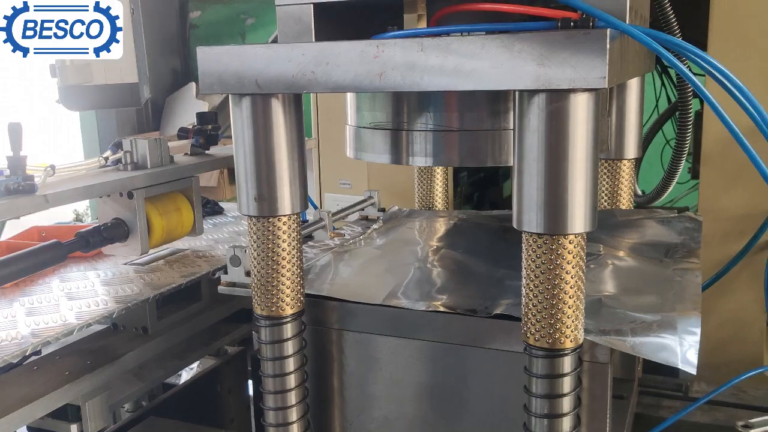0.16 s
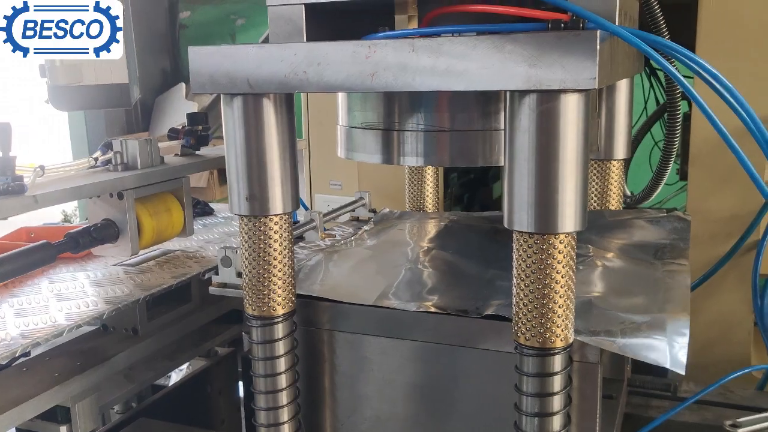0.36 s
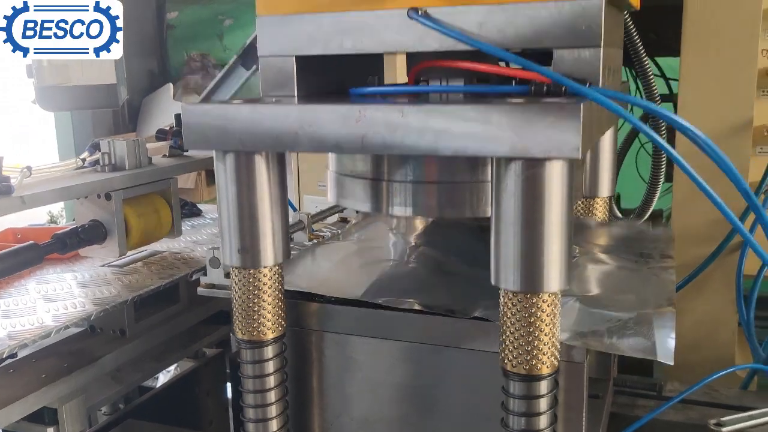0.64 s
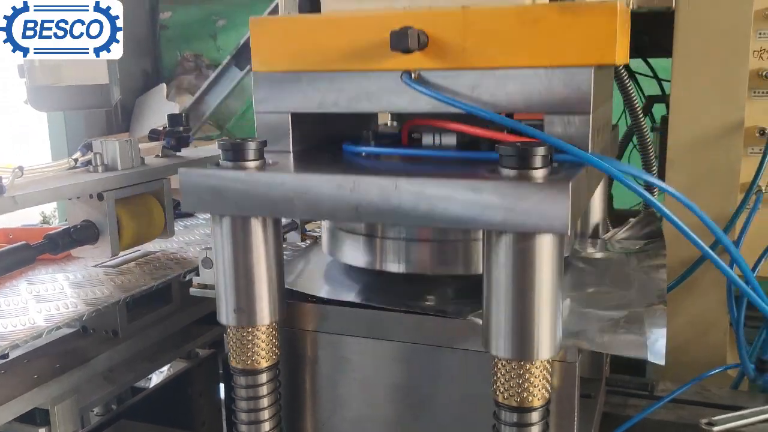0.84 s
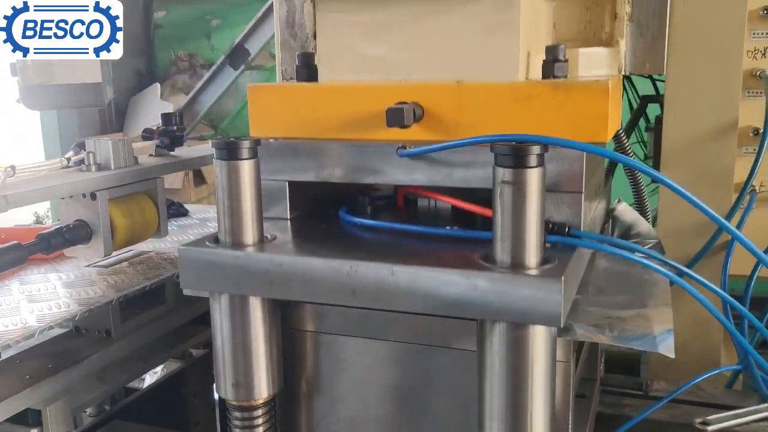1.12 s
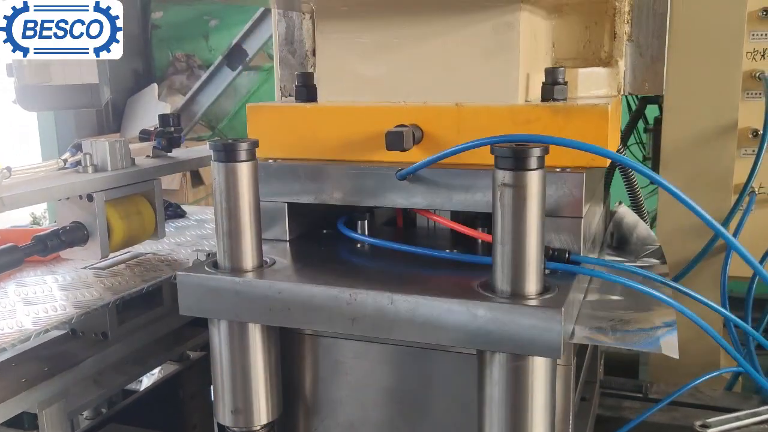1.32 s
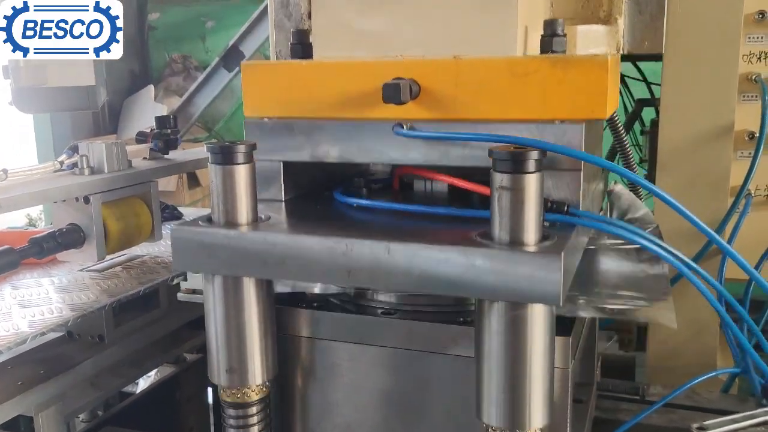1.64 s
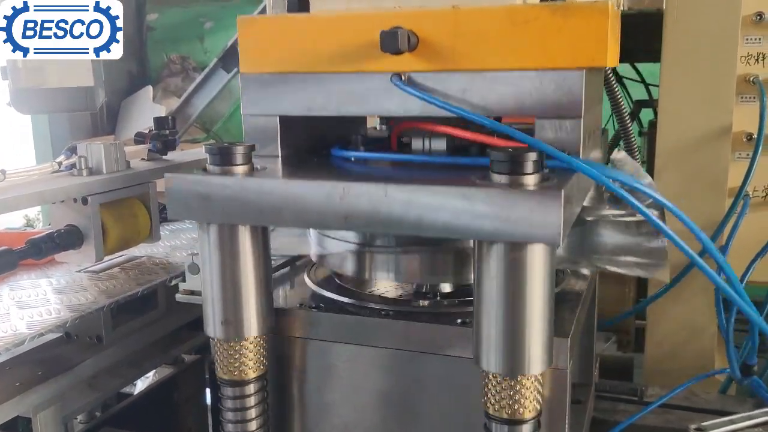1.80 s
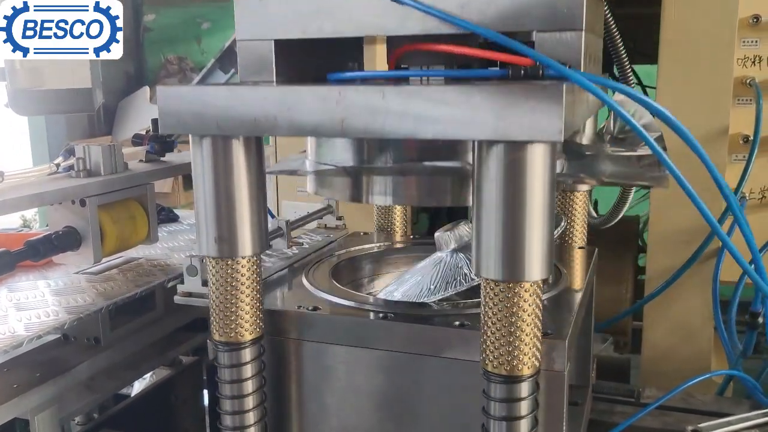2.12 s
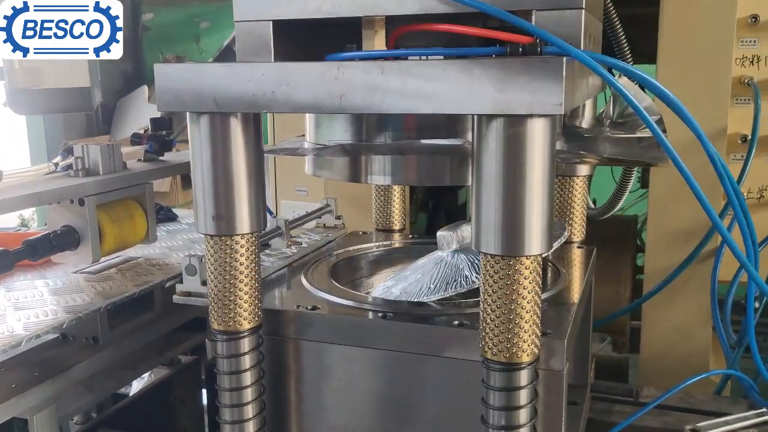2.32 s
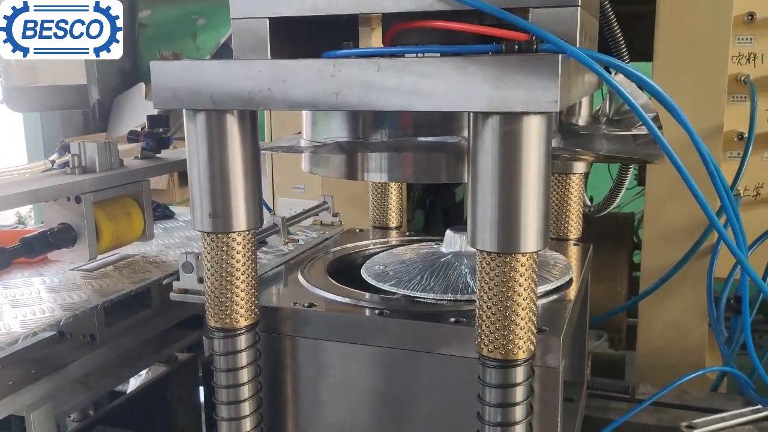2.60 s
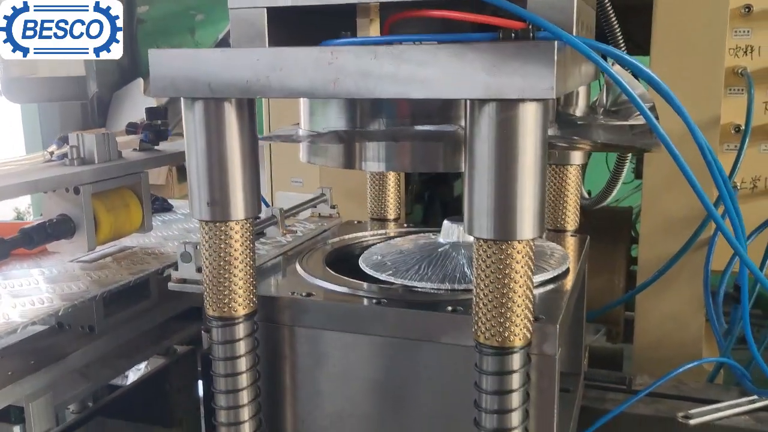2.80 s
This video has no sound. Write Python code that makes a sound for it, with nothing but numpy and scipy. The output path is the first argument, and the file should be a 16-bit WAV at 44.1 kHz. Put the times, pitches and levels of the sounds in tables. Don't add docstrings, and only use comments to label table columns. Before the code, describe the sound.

Close phone pickup of a metal press cycling in a noisy hall: clunk, pause, clattering die blows and foil crinkle, heavy bang with low throb, strong half-second air blast, then small knocks and rattling.

```python
import sys
import numpy as np
from scipy import signal
from scipy.fft import rfft, irfft, next_fast_len
from scipy.io import wavfile
from scipy.ndimage import uniform_filter1d

SR = 44100
rng = np.random.default_rng(int(sys.argv[2]) if len(sys.argv) > 2 else 0)


def nominal_scale(level):
    x = np.asarray(level, float) / 20
    return 10 ** x


def output_pcm(signal):
    pcm = np.clip(np.atleast_2d(signal).T, -1, 1) * 32767
    wavfile.write(sys.argv[1], SR, np.round(pcm).astype(np.int16))


N = 130095

# f/Hz, level/dB, t60/s
FRAME_MODES = [(198.5, -36, 0.083), (272, -24, 0.076), (295.2, -1, 0.4), (381, -3.5, 0.59), (558, -2, 0.47),
               (679, -10.5, 0.33), (724, 2.5, 0.21), (981, 0, 0.19), (1070, -25, 0.1), (1216, -19, 0.89),
               (1461, -0.5, 0.15), (1767, 11.5, 0.041), (2084, 1, 0.17), (2507, -37, 0.096)]


def level(x, db):
    return x * nominal_scale(db) / np.sqrt(np.mean(x ** 2))


def curve(table, axis=1):
    rows = np.array(table)
    return np.interp(np.arange(N) / SR, rows[:, 0], rows[:, axis])


def colour(x, tone):
    rows = np.array(tone, float)
    hz = np.arange(N // 2 + 1) * SR / N + 1
    gain_db = np.interp(np.log(hz), np.log(rows[:, 0] + 1), rows[:, 1])
    return irfft(rfft(x) * nominal_scale(gain_db), N)


def butter(x, order, hz, kind="low"):
    return signal.sosfilt(signal.butter(order, hz, kind, fs=SR, output="sos"), x)


def ring(x, hz, t60_s):
    r = np.exp(-np.log(1000) / (max(t60_s, .005) * SR))
    w = 2 * np.pi * hz / SR
    return signal.lfilter([np.sin(w)], [1, -2 * r * np.cos(w), r * r], x)


def walk(rate_per_s):
    k = int(SR / rate_per_s)
    steps = np.repeat(rng.standard_normal(N // k + 1), k)
    return 1.3 * uniform_filter1d(uniform_filter1d(steps, k), k)[:N]


def clicks(rate_per_s, spread_db):
    u = rng.random((3, N))
    size = nominal_scale(-spread_db * np.log(u[2] + .05))
    return (u[0] < rate_per_s / SR) * np.sign(u[1] - .5) * size


def breathing(x, flicker_db, swell_db, rate_per_s):
    spec, hz = rfft(x), np.arange(N // 2 + 1) * SR / N + 1
    out, swell = 0, walk(1.35)
    for centre_hz in 30 * 2 ** np.arange(0, 9.6, .4):
        offset = np.clip(np.log2(hz / centre_hz) / .4, -1, 1)
        band = irfft(spec * np.cos(np.pi / 2 * offset) ** 2, N)
        out = out + band * nominal_scale(flicker_db * walk(rate_per_s) + swell_db * swell)
    return level(out, 0)


def frame(x, weights_db):
    return sum(nominal_scale(db + w) * ring(x, hz, t60_s) for (hz, db, t60_s), w in zip(FRAME_MODES, weights_db))


def knocks():
    # t/s, peak/dB, centre f/Hz, t60/s, mode spread/octaves
    struck_parts = [(0.1943, -2, 602, 0.11, .7), (0.199, -8, 195, 0.064, 0.083),
                    (0.205, -12, 573, 0.098, 0.032), (.209, -12, 730, 0.048, 0.024),
                    (.22, -6.5, 703, 0.078, 0.026), (.198, -13.5, 1090, 0.1, 0.04),
                    (.24, -16, 292, 0.09, 0.18), (.24, -11.5, 1800, 0.23, .5), (.26, -11, 859, 0.075, 0.13),
                    (.272, -15, 725, 0.084, 0.041), (.29, -19, 657, 0.9, 0.22),
                    (0.524, -7, 1800, 0.076, .45), (.524, -20, 652.5, 0.86, 0.23),
                    (0.7482, -8.5, 1690, .04, 0.18), (0.759, -15, 1530, 0.068, 0.15),
                    (.812, -13, 1805, 0.045, .1), (.85, -19, 1327, 0.11, 0.097),
                    (0.911, -22, 1130, 0.037, 0.087), (.9583, -7, 1960, .05, .07),
                    (.982, -3, 1700, .018, .3), (.779, -4, 1800, .02, .4), (.995, -9, 2100, .06, .12),
                    (1.029, -6, 800, .045, .15), (1.0336, -2, 2150, .04, .25), (1.219, -4, 1600, .03, .3),
                    (1.28, -8.5, 1436, 0.029, 0.025), (1.367, -14, 477, .04, 0.67),
                    (1.557, -14.5, 1340, .09, 0.017), (1.577, -18, 1520, .07, .03),
                    (1.6455, -1, 900, .03, .8), (1.651, -4, 1465, .08, .015), (1.833, -2, 1750, .04, .45),
                    (1.836, -8, 773, .13, .015), (1.945, -5.5, 2350, 0.059, 0.32),
                    (2.286, -11, 262, 0.027, 0.29), (2.288, -6, 191.6, 0.12, 0.052),
                    (2.333, -11.5, 352, 0.061, 0.46), (2.405, -14.5, 324, 0.11, 0.38),
                    (2.528, -13, 396, .15, 0.68), (2.582, -15.5, 700, 0.21, 0.017),
                    (1.6465, -5.5, 427, 0.036, 0.318),
        (1.649, -6, 1900, 0.045, 0.19),
        (0.81, -10, 1550, 0.03, 0.084),
        (1.837, -7, 1600, 0.054, 0.143),
        (1.949, -9.5, 2800, 0.063, .15),
        (.535, -16, 1400, 0.18, 0.31),
        (2.1, -23, 1250, .1, .02),
        (1.7, -17, 1030, 0.078, 0.031),
    ]
    push_s, crack_s, crack_db = 0.0093, 0.025, -12
    frame_db, frame_hz = -4, 515
    blows = struck_parts
    out, size = np.zeros(N + SR), SR // 3
    t = np.arange(size) / SR
    chance = rng.standard_normal((len(blows), 3, size))
    spots = rng.standard_normal((len(blows), len(FRAME_MODES)))

    def peak(x):
        return x / abs(x).max()

    for (s, db, hz, t60_s, octaves), (a, b, c), spot in zip(blows, chance, spots):
        push = 0.38 * a * np.exp(-t / min(push_s, t60_s / 12))
        push[:4] += 3
        push[:int(SR / hz / 2)] += 1.7 * (octaves < .3)
        part = 0
        for k, u in enumerate(np.linspace(-2.2, 2.2, 45) + .03 * b[:45]):
            hit = np.roll(push, 2 * k) * np.sign(c[k]) if octaves > .08 else push
            part = part + np.exp(-u * u / 2) * ring(hit, hz * 2 ** (octaves * u), t60_s)
        body = frame(c * np.exp(-t / (2 * push_s)), 3.4 * spot)
        crack = butter(b, 2, [2500, 8500], "band") * np.exp(-t / crack_s)
        breadth = min(2 * octaves, 1)
        blow = peak(part) + nominal_scale(frame_db) * min(frame_hz / hz, 1) * breadth * peak(body)
        blow = blow + nominal_scale(crack_db) * breadth * peak(crack)
        i = int(s * SR)
        out[i:i + size] += nominal_scale(db) * (1 - t / t[-1]) * blow
    return butter(out[:N], 3, 140, "high")


def bed():
    start_s, thud_db, t60_s = 1.647, -9, 0.66
    centre_hz, beat_hz, balance = 244, 17.3, 1
    t = np.maximum(np.arange(N) / SR - start_s, 0)
    lower = np.sin(2 * np.pi * (centre_hz - beat_hz / 2) * (t - .012))
    upper = np.sin(2 * np.pi * (centre_hz + beat_hz / 2) * (t - .012))
    pair = (lower + balance * upper) / (1 + balance)
    return nominal_scale(thud_db) * pair * np.minimum(t / 0.0028, 1) * nominal_scale(-60 * t / t60_s)


def foil():
    # t/s, level/dB, brightness/dB
    strain = [(.715, -30.5, 1), (.75, -18.5, 7), (.8, -20, 5.5), (.92, -24.5, 1), (.96, -17.5, 4),
              (1.03, -17, 17), (1.065, -31, 13), (1.14, -22.5, 3), (1.2, -29.5, 8.5), (1.3, -23.5, 10),
              (1.36, -36, 4.5), (1.54, -34, 13), (1.6, -22, 5), (1.8, -24.5, 9), (1.95, -24.5, 6),
              (2.25, -25.5, 2), (2.34, -21.5, 13), (2.43, -33, 11.5)]
    # f/Hz, level/dB per Hz
    sheet_tone = [(150, -6.5), (500, 0), (850, 5.5), (1100, 4), (1500, 6), (2100, 2), (2700, -7),
                  (3700, -18), (7000, -11), (11500, -46.5)]
    crackles_per_s, spread_db, fade_db_per_s = 2300, 5, -21
    crackle = level(clicks(crackles_per_s, spread_db), 0) + 2.1 * rng.standard_normal(N)
    x = breathing(colour(crackle, sheet_tone), 1.9, .2, 55.) * nominal_scale(1.2 * walk(90))
    low, high = butter(x, 4, 3000), butter(x, 4, 3000, "high")
    t = np.arange(N) / SR
    fade_db = fade_db_per_s * np.maximum(t - strain[-1][0], 0)
    bright = low + high * nominal_scale(curve(strain, axis=2))
    return bright * nominal_scale(curve(strain) + fade_db) * (np.arange(N) > strain[0][0] * SR)


def air():
    # t/s, level/dB
    jet = [
        (1.8, -44),
        (1.84, -17),
        (1.862, -37),
        (1.885, -19.5),
        (1.95, -19),
        (2.1, -15),
        (2.3, -16),
        (2.37, -22),
        (2.41, -37),
    ]
    # f/Hz, level/dB per Hz
    jet_tone = [(1470, -44), (2500, -13), (2950, -17.5), (4410, -7.5), (7170, 1.0), (9620, -11.0),
                (11500, -16), (15000, -16), (22000, -120), (15000, -18)]
    t = np.arange(N) / SR
    hiss = breathing(colour(rng.standard_normal(N), sorted(jet_tone)), 0.8, 0.83, 11.28)
    cutoff = nominal_scale(-200 * np.maximum(t - jet[-1][0], 0))
    return hiss * nominal_scale(curve(jet)) * (t > jet[0][0]) * cutoff


def rattle():
    # t/s, level/dB
    shaking = [
        (1.08, -31.5),
        (1.14, -25.5),
        (1.3, -38),
        (1.45, -31),
        (1.62, -39.5),
        (1.72, -33),
        (2.3, -29),
        (2.35, -19.5),
        (2.8, -41),
    ]
    bumps = uniform_filter1d(clicks(150, -2), size=20)
    x = sum(nominal_scale(db) * ring(bumps, hz, 0.098 * t60_s) for hz, db, t60_s in FRAME_MODES[:8])
    return level(x, 0) * nominal_scale(curve(shaking)) * (np.arange(N) > shaking[0][0] * SR)


def hall():
    # f/Hz, level/dB per Hz
    hall_tone = [(30, -31), (60, 9.5), (170, -2), (736, -3), (937, -3.5), (3360, -11), (4000, -18),
                 (5200, -14), (6640, -2), (11500, -18), (15000, -19), (22000, -120)]
    hall_db, leak_db, leak_hz, leak_width_hz = -31, -41, 7050, 1100
    edges_hz = [leak_hz - leak_width_hz / 2, leak_hz + leak_width_hz / 2]
    leak = level(butter(rng.standard_normal(N), 2, edges_hz, "band"), leak_db)
    machines = breathing(colour(rng.standard_normal(N), hall_tone), 0.96, 0.59, 13.0)
    return nominal_scale(hall_db) * machines + leak * nominal_scale(0.48 * walk(6.9))


def room(near):
    t60_s, top_hz, stir_per_s = 1, 2350, 40
    t = np.arange(SR) / SR
    tail = rng.standard_normal(SR) * np.exp(-np.log(1000) * t / t60_s) * np.minimum(t / 0.0057, 1)
    tail = butter(tail, 1, top_hz)
    wet = signal.fftconvolve(near, tail / np.sqrt(sum(tail ** 2)))[:N]
    return np.real(signal.hilbert(wet, next_fast_len(N))[:N] * np.exp(1.5j * walk(stir_per_s)))


def ports(mid):
    # f/Hz, side minus mid/dB
    side_tone = [(30, -5), (110, 3), (200, -17), (380, -11), (700, -7.5), (1290, -1.5), (2380, -0.5),
                 (4400, -2), (8120, 0.5), (15000, 1)]
    drift_per_s, alike = 130, .4
    turn = alike * 1j + walk(drift_per_s) + 1j * walk(drift_per_s)
    shifted = np.real(signal.hilbert(mid, next_fast_len(N))[:N] * turn / abs(turn))
    side = colour(shifted, side_tone)
    return np.array([mid + side, mid - side])


def scene():
    near = knocks() + foil() + rattle() + air()
    return ports(near + nominal_scale(-12.5) * room(near) + hall() + bed())


def duck(x):
    # t/s, depth/dB, hold/s, release/s
    dips = [
        (1.066, -4, .04, .04),
        (1.674, -13, .055, .07),
    ]
    attack_s, bass_hz, bass_share = .01, [130, 1030], 0.32
    t, db = np.arange(N) / SR, 0
    for s, depth_db, hold_s, release_s in dips:
        corners_s = [s - attack_s, s, s + hold_s, s + hold_s + release_s]
        db = db + depth_db * np.interp(t, corners_s, [0, 1, 1, 0])
    bass = signal.sosfiltfilt(signal.butter(1, bass_hz, "band", fs=SR, output="sos"), x)
    return bass * nominal_scale(bass_share * db) + (x - bass) * nominal_scale(db)


def thin(x):
    # f/Hz, surviving level re neighbourhood/dB
    survival = [(2500, -18), (4500, -3.5), (6500, -2.5), (8000, -3), (10000, 0.5), (11700, -2.5), (13500, 3),
                (15500, 2)]
    hz, _, z = signal.stft(x, SR, nperseg=1024)
    power = abs(z) ** 2 + 1e-20
    near = uniform_filter1d(uniform_filter1d(power, size=5, axis=0), size=3, axis=1)
    wide = uniform_filter1d(uniform_filter1d(power, size=41, axis=0), size=3, axis=1)
    limit_db = np.interp(hz, *np.array(survival).T, left=-99)[:, None]
    contrast_db = 10 * np.log10((abs(near) + 1e-14) / (abs(wide) + 1e-14))
    keep = np.clip(contrast_db - limit_db, 0, 1)
    return signal.istft(z * keep, SR, nperseg=1024)[1][:N]


def band_limit(x):
    return signal.sosfilt(signal.butter(12, 16400, fs=SR, output="sos"), x)


def record(dry):
    # f/Hz, level/dB
    overall_tone = [(20, -18), (120, -6), (200, 0), (11600, 0), (11800, -60), (12800, -60), (13200, -9),
                    (14400, -2), (15700, -6), (15900, -60)]
    start_s = .0414
    limited = np.tanh(1.18 * duck(dry)) / 1.13
    x = np.array([thin(colour(c, overall_tone)) for c in limited])
    return band_limit(x * np.clip((np.arange(N) / SR - start_s) / 0.004 + 1, 0, 1))


dry = scene()
out = record(dry)
output_pcm(out)
```